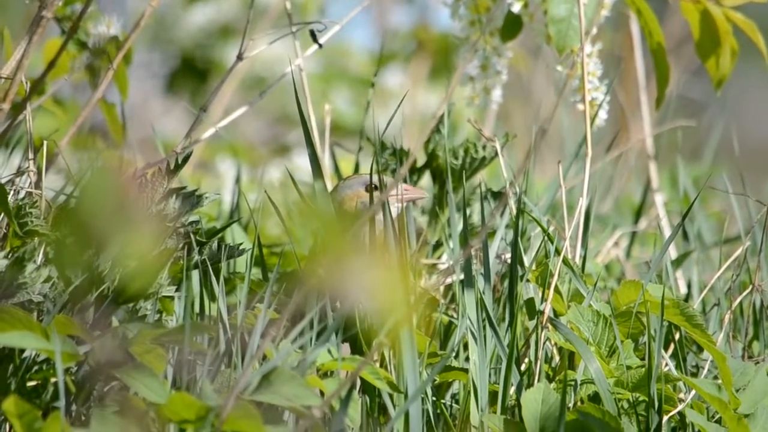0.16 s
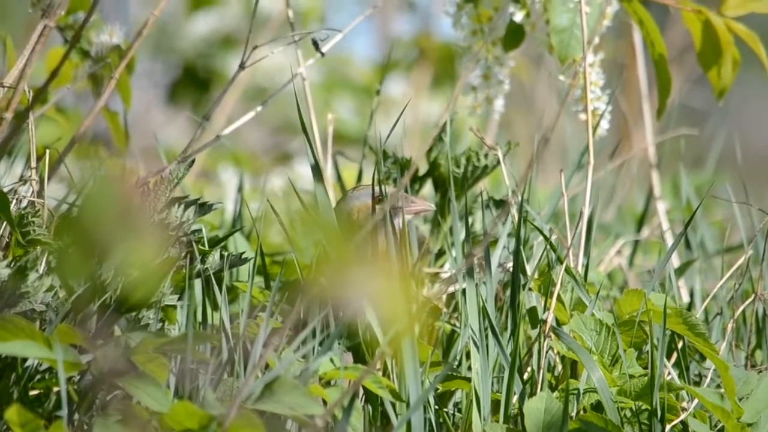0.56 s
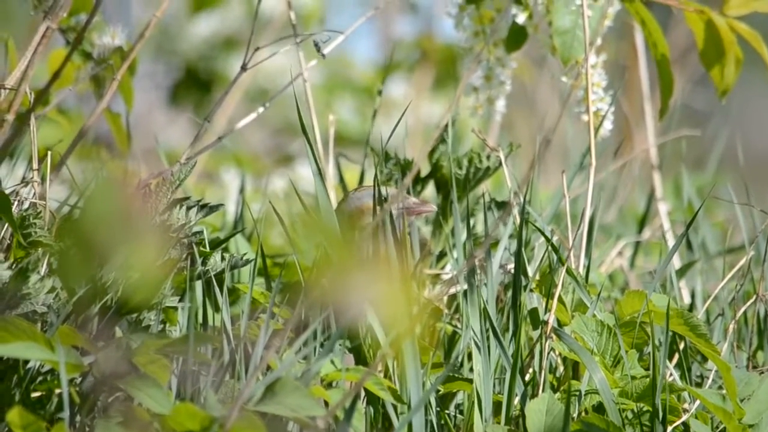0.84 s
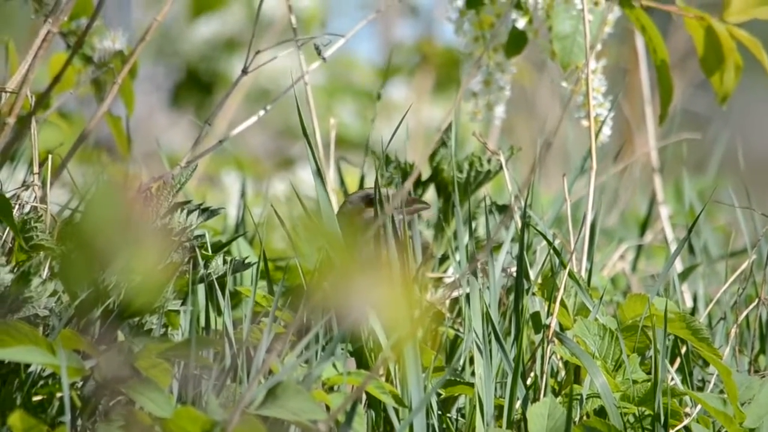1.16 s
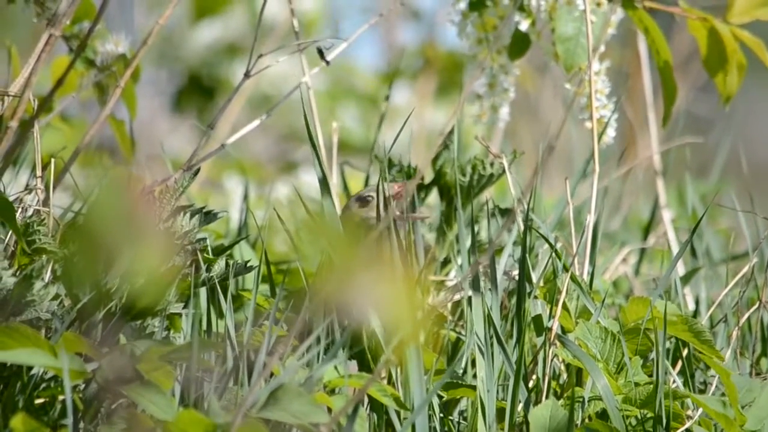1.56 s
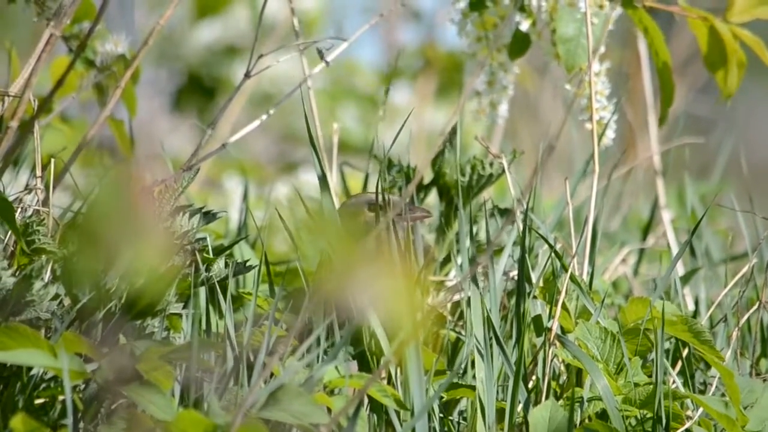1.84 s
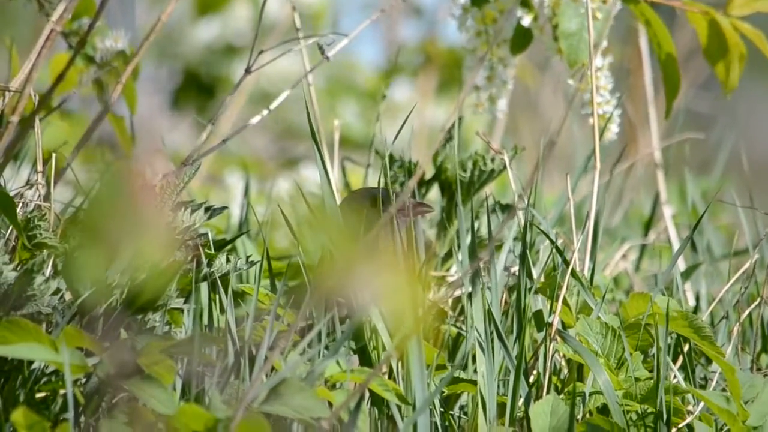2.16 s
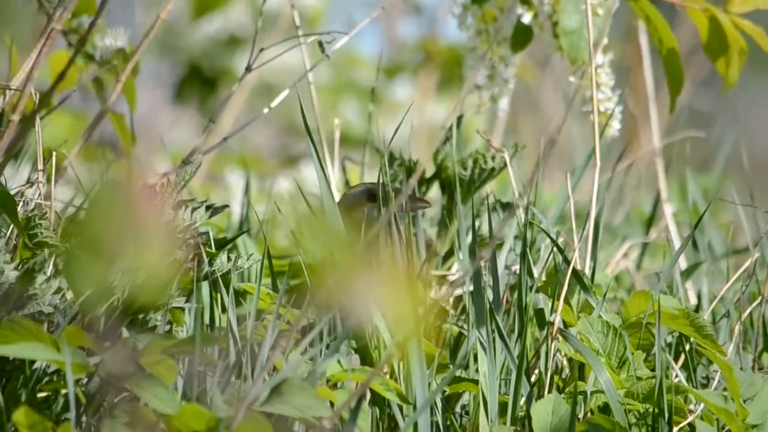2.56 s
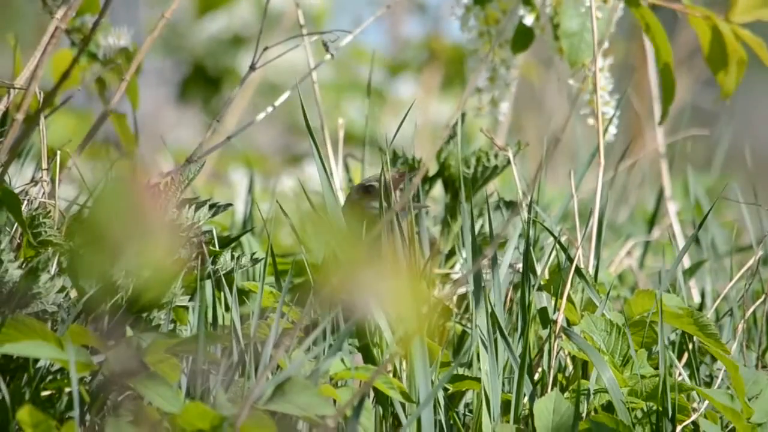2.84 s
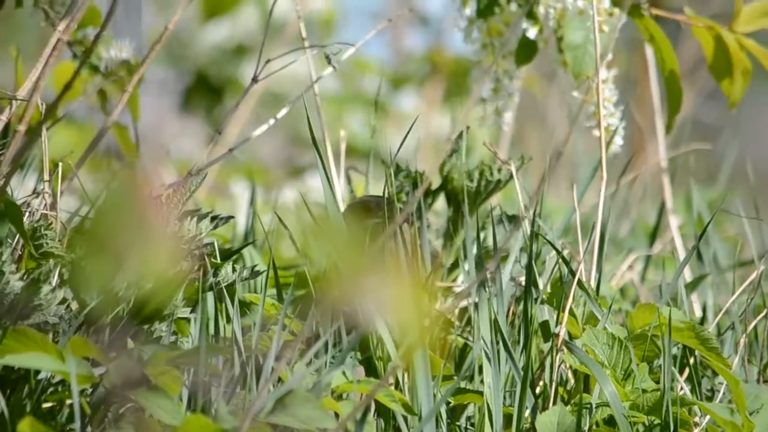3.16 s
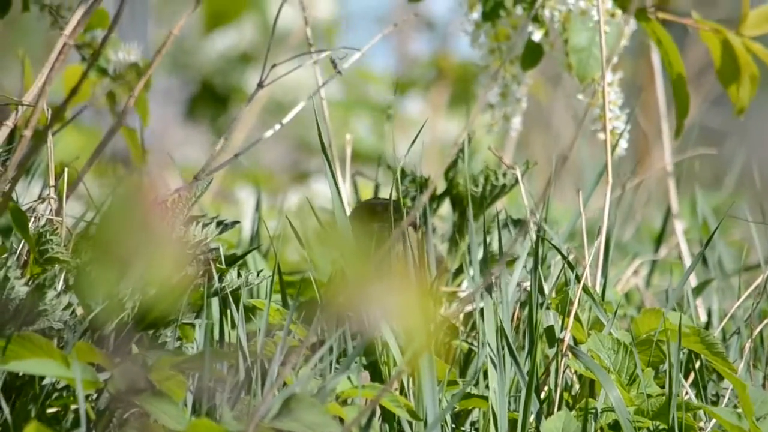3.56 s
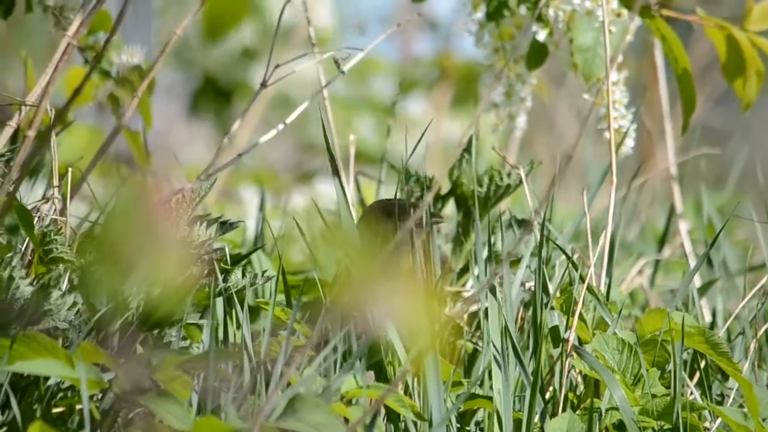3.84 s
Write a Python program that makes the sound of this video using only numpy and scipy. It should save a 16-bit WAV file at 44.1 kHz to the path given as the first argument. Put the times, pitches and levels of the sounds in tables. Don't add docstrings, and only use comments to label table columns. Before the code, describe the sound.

Loud comb-like corncrake rasps, alternating a shorter and a slightly longer burst, ring briefly in the grass. Between them lie very faint air and insect hiss, barely audible distant chirps and soft thumps on the microphone.

```python
import sys
import numpy as np
from scipy import signal
from scipy.fft import rfft, irfft
from scipy.io import wavfile
from scipy.ndimage import uniform_filter1d, map_coordinates

SR = 44100
rng = np.random.default_rng(int(sys.argv[2]) if len(sys.argv) > 2 else 0)


def dump(signal):
    limited = np.clip(np.atleast_2d(signal).T, -1, 1)
    pcm = np.round(limited * 32767).astype(np.int16)
    wavfile.write(sys.argv[1], SR, pcm)


def how_loud(loudness_db):
    steps = np.asarray(loudness_db, float) / 20
    return 10 ** steps


N = 176400
PAD = SR // 2

SHORT_RHYTHM = [0, 6.4, 14, 25.1, 32.2, 42.6, 51.7, 60.2, 72, 79.2, 90.1, 97, 106.5, 114.1, 123.4, 132.7,
                140.6, 151.5, 161.4]
LONG_RHYTHM = [0, 6.3, 14, 25.1, 32.1, 42.6, 50.6, 59.3, 70.6, 77.8, 89.3, 96.2, 106.5, 113.8, 123.6, 131.4,
               140.9, 149.7, 158.6, 168.9, 178.8]
# start_s, longest_ms, slowing_at_end_ms
RASPS = [
    (-.222, 165, 0),
    (.2743, 180, 0),
    (1.0429, 165, 0),
    (1.5442, 180, 0),
    (2.3305, 165, 3),
    (2.8276, 172, 1.3),
    (3.6886, 165, 0),
]
RASP_LEVELS = [-10, -10.5, -10.5, -9.5, -10.5, -9, -10]
# pitch_hz, level_db, t60_s, growth_over_rasp_db
WINDPIPE_MODES = [(170, -45, 0.02, -5), (1183, -21.5, 0.0095, -1), (1847, -25, 0.011, -5),
                  (2250, -17, 0.0076, -3.5), (3175, -16, 0.0072, 4), (3900, -15, 0.0068, 5),
                  (4590, -18.5, 0.0084, -1), (5500, -8.5, 0.01, 1), (6300, -2.5, 0.0025, -0.5),
                  (7300, -23, 0.0057, 0.5), (7730, -26, .005, -3), (9460, -27.5, 0.0084, 0.5),
                  (10560, -25, 0.0062, -1), (12950, -62, .01, -9)]
# pitch_hz, width_hz, depth_0_to_1
SIDE_CAVITIES = [(1471, 320, 0.6), (8270, 160, 0.5), (10580, 200, .8)]
# low_hz, high_hz, build_up_s, level_db, t60_s
GRASS_BANDS = [(102.9, 1000, 0.0026, -30.5, 0.13), (1603, 2700, .002, -29, 0.14),
               (2650, 4300, 0.00073, -30, .1), (4050, 4960, 0.0033, -34, 0.12),
               (5606, 7600, .002, -36.5, .085), (7400, 19000, 0.0005, -28, .11),
               (500, 8000, .02, -68.5, .5)]
# pitch_hz, level_db
AIR_COLOUR = [(15, -33), (25, -6.5), (69, -7), (145, -8), (455, -2.5), (491, -6.5), (633, -4.5),
              (2840, -12), (11000, -31), (14200, -67), (22000, -120)]
# time_s, peak_db, pitch_hz
BUMPS = [
    (.312, -55, 88),
    (0.513, -60, 90),
    (.905, -56, 90),
    (1.38, -63.5, 90),
    (1.876, -50.5, 105),
    (2.038, -49, 93.5),
    (2.158, -65, 85),
    (3.51, -72, 70),
]
# time_s, pitch_hz, level_db
RISING_NOTE = [(.862, 4300, -78), (.882, 4490, -66), (.892, 4790, -67), (.902, 5300, -70),
               (.914, 5350, -76), (.926, 5100, -88)]
DIPPING_NOTE = [(.978, 4250, -88), (.998, 3560, -65.5), (1.008, 3450, -70), (1.028, 3860, -64.5),
                (1.039, 4000, -64.5)]
FIRST_CHIP = [(.538, 3050, -83), (.545, 2990, -61), (.552, 2750, -67), (.557, 2273, -82)]
SECOND_CHIP = [(0.667, 3280, -69), (.676, 2860, -62), (.684, 2350, -78)]
UPWARD_CHIP = [(.552, 2800, -83), (.558, 3220, -62), (.566, 3800, -81)]
LOWER_RISING_NOTE = [(.893, 3400, -86), (.903, 3720, -73), (.92, 4340, -86)]

SWELL_DB, SWELL_S, GROWTH_DB_PER_S = -5, 0.02, 4.5
FADE_DB, FADE_S = -1, 0.007
GAP_DB_PER_MS, GAP_DULL_DB_PER_MS = -0.23, 0.37
CLICK_SPREAD_DB, MODE_SPREAD_DB, DETUNE, JITTER_S = 0.6, 1.8, 0.012, 0.00015
RISE_S, LOW_RISE_S = 0.00011, 0.00057
REBOUND_S, REBOUND_DB, REBOUND_GROWTH_DB = 0.00082, -2, 3


def butter(x, hz, kind, order):
    return signal.sosfilt(signal.butter(order, hz, kind, fs=SR, output="sos"), x)


def drift(rate_hz):
    knots = rng.standard_normal(200)
    return map_coordinates(knots, [np.arange(N) / SR * rate_hz + 2], order=3)


def notch(x, hz, width_hz, depth):
    b, a = signal.iirpeak(hz, hz / width_hz, fs=SR)
    return x - np.clip(depth, 0, 1) * signal.lfilter(b, a, x)


def air():
    level_db, steady_lumps_db, gust_db = -66.5, 0.76, 3.0
    edges = 22 * 2 ** np.arange(0, 9.6, 0.5)
    colour_hz, colour_db = np.array(AIR_COLOUR).T
    white = rng.standard_normal((2, N + PAD))
    hiss = 0
    for k, (low, high) in enumerate(zip(edges, edges[1:])):
        hz = np.sqrt(low * high)
        breeze = np.clip(np.log2(200 / hz), 0, 1)
        lumps_db = (steady_lumps_db + gust_db * breeze) * drift(11)
        band_db = np.interp(np.log(hz), np.log(colour_hz), colour_db)
        band = butter(white[k % 2], [low, high], "band", order=2)[PAD:]
        hiss = hiss + how_loud(band_db + lumps_db) * band
    return how_loud(level_db) * hiss / hiss.std()


def insects():
    centre_hz, width_hz, level_db = 4680, 250, -83.5
    band = [centre_hz - width_hz / 2, centre_hz + width_hz / 2]
    hiss = butter(rng.standard_normal(N), band, "band", order=1)
    return how_loud(level_db + 1.5 * drift(6.1)) * hiss / hiss.std()


def songbird():
    t = np.arange(N) / SR
    song = 0
    for note in (RISING_NOTE, DIPPING_NOTE, FIRST_CHIP, SECOND_CHIP, UPWARD_CHIP, LOWER_RISING_NOTE):
        s, hz, db = np.transpose(note)
        pitch = uniform_filter1d(np.interp(t, s, hz), size=200)
        loudness = how_loud(np.interp(t, s, db, -200, -200))
        song = song + loudness * np.sin(2 * np.pi * np.cumsum(pitch) / SR)
    smear = rng.standard_normal(2000) * how_loud(-32 - 60 * np.arange(2000) / SR / 0.05)
    return song + signal.fftconvolve(song, smear)[:N]


def bumps():
    t = np.arange(N) / SR
    out = np.zeros(N)
    for s, db, hz in BUMPS:
        swing = np.exp(-((t - s) * hz * 2.1) ** 2)
        out -= how_loud(db) * np.cos(2 * np.pi * hz * (t - s)) * swing
    return out


def scatter():
    t = np.arange(PAD) / SR
    response = 0
    for low_hz, high_hz, build, db, t60 in GRASS_BANDS:
        reflections = rng.choice([-1., 1.], PAD)
        tail = reflections * how_loud(db - 60 * t / t60) * np.clip(t / build, 0, 1) ** 2
        response = response + butter(tail, [low_hz, high_hz], "band", order=2)
    return response


def grass(bird):
    new_share = 0.6
    out = np.zeros(len(bird) + 2 * PAD)
    same = scatter()
    for start, *_ in RASPS:
        i = PAD + int(start * SR) - 100
        response = np.sqrt(1 - new_share) * same + np.sqrt(new_share) * scatter()
        wet = signal.fftconvolve(bird[i:i + PAD // 2], response)
        out[i:i + len(wet)] += wet
    return out[:len(bird)]


def click_modes(opening, late_ms, luck, t):
    hz, db, t60, growth = np.transpose(WINDPIPE_MODES)[:, :, None]
    sign = (-1) ** np.arange(len(WINDPIPE_MODES))[:, None]
    rise = 1 - np.exp(-t / np.where(hz < 4300, LOW_RISE_S, RISE_S))
    dulling = GAP_DULL_DB_PER_MS * late_ms * ((hz > 3500) & (hz < 5600))
    gain = sign * how_loud(db + growth * opening + dulling + MODE_SPREAD_DB * luck[0])
    ring = np.sin(2 * np.pi * hz * (1 + DETUNE * luck[1]) * t)
    return gain * rise * how_loud(-60 * t / t60) * ring


def corncrake():
    pipe, chest = np.zeros(N + 2 * PAD), np.zeros(N + 2 * PAD)
    t = np.arange(1500) / SR
    lag = int(REBOUND_S * SR)
    for k, (start, lasts, slowing) in enumerate(RASPS):
        rhythm = (SHORT_RHYTHM, LONG_RHYTHM)[k % 2]
        ms = np.array([m for m in rhythm if m < lasts])
        s = (ms + slowing * (ms / ms[-1]) ** 3) / 1000
        wait_ms = np.diff(ms, prepend=-9) - 9
        effort = RASP_LEVELS[k] + SWELL_DB * np.exp(-s / SWELL_S) + GROWTH_DB_PER_S * (s - 0.1)
        effort = effort + FADE_DB * np.exp((s - s[-1]) / FADE_S) + GAP_DB_PER_MS * wait_ms
        for at, level, late_ms in zip(s, effort, wait_ms):
            luck = rng.standard_normal((3, len(WINDPIPE_MODES), 1))
            opening = at / s[-1] - 0.5
            modes = click_modes(opening, late_ms, luck, t)
            click = modes[1:].sum(axis=0)
            rebound = how_loud(REBOUND_DB + REBOUND_GROWTH_DB * opening + luck[2, 3])
            click[lag:] += rebound * modes[6:, :-lag].sum(axis=0)
            strength = how_loud(level + 2.0 + CLICK_SPREAD_DB * luck[2, 0]) / np.abs(click).max()
            i = PAD + int((start + at + JITTER_S * luck[2, 1, 0]) * SR)
            chest[i:i + len(t)] += strength * modes[0]
            pipe[i:i + len(t)] += strength * click
    for cavity in SIDE_CAVITIES:
        pipe = notch(pipe, *cavity)
    return butter(pipe, 797, "high", order=6) + butter(chest, 170, "high", order=4)


def scene():
    bird = corncrake()
    call = (bird + grass(bird))[PAD:PAD + N]
    return (call + air() + insects() + bumps() + songbird())[None]


def roll_off(x):
    return signal.sosfilt(signal.butter(12, 14200, fs=SR, output="sos"), x)


def record(dry):
    bass_hz, top_hz, cutoff_hz, edge_hz = 620, 10480, 11150, 40
    gap_start_s, gap_end_s = 1.683, 1.724
    dry = butter(dry, 35, "high", order=2)
    hz, t = np.fft.rfftfreq(N, 1 / SR), np.arange(N) / SR
    spectrum = rfft(dry)

    def part(low, high):
        window = (np.tanh((hz - low) / edge_hz) - np.tanh((hz - high) / edge_hz)) / 2
        return irfft(spectrum * window, N)

    def comes_and_goes():
        return uniform_filter1d(1. * (drift(20) > -0.4), size=300)

    bass_on = uniform_filter1d(1. * ((t < gap_start_s) | (t > gap_end_s)), size=300)
    out = bass_on * part(-SR, bass_hz) + part(bass_hz, top_hz)
    top = how_loud(-2.5) * part(top_hz, cutoff_hz) + how_loud(-26) * part(cutoff_hz, 12300)
    out = out + comes_and_goes() * top
    out = out + comes_and_goes() * how_loud(-13) * part(12820, 13150)
    return roll_off(out)


dry = scene()
out = record(dry)
dump(out)
```